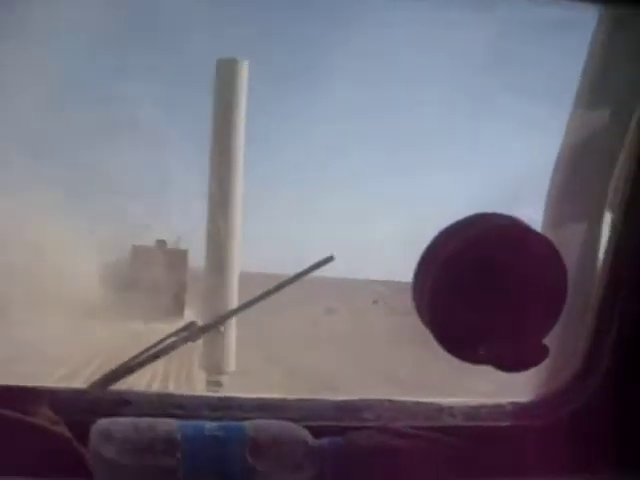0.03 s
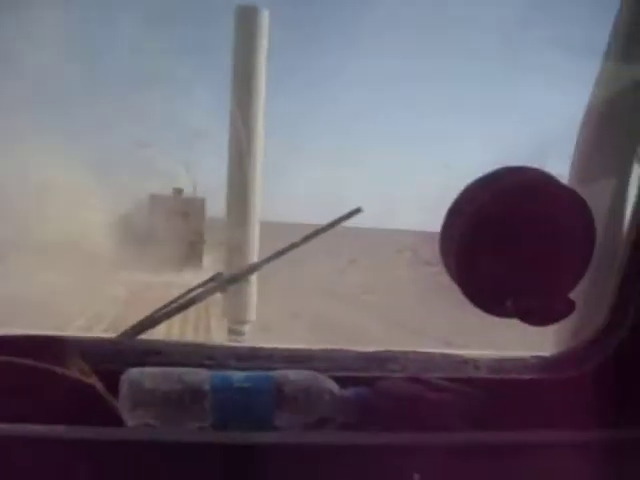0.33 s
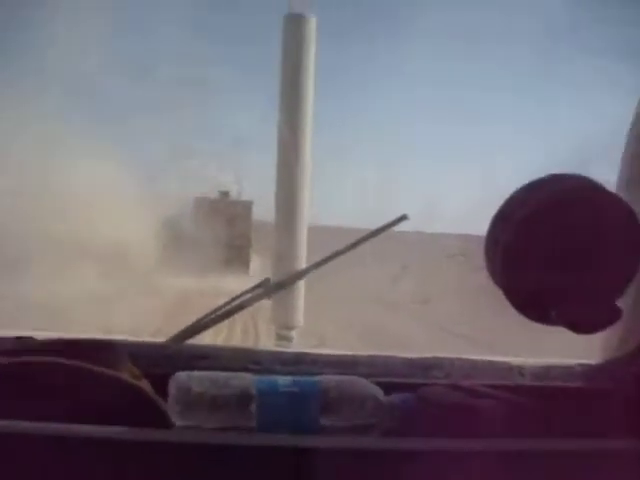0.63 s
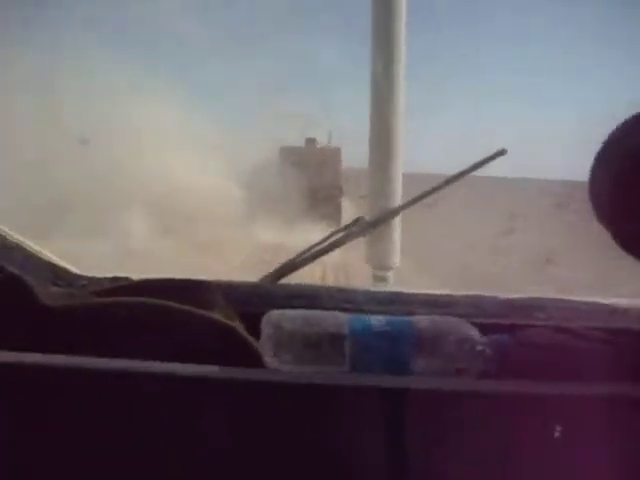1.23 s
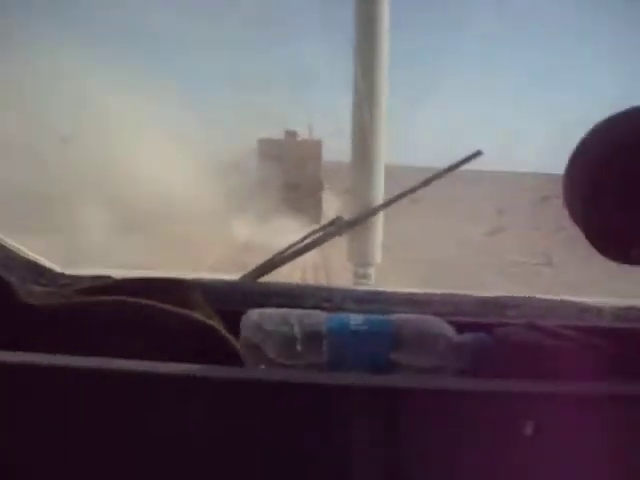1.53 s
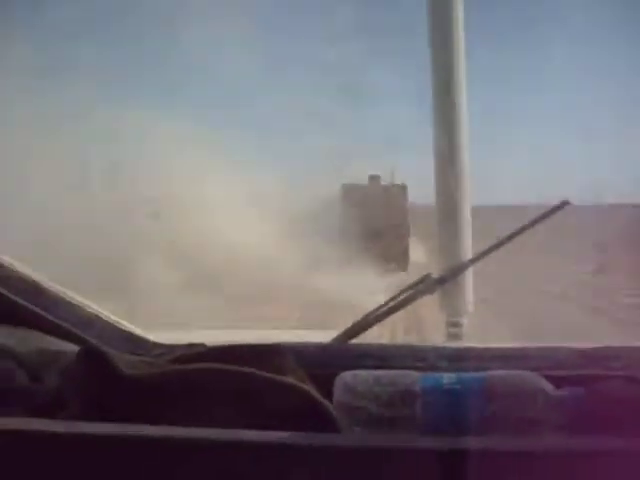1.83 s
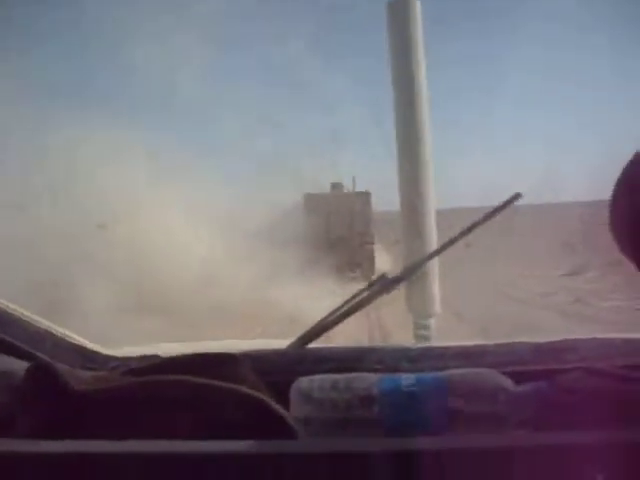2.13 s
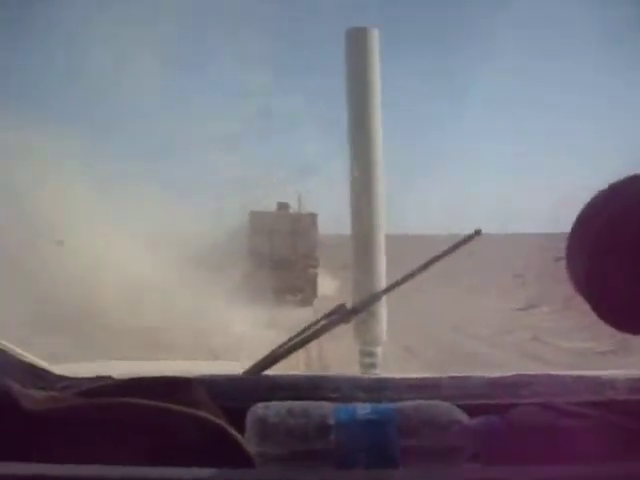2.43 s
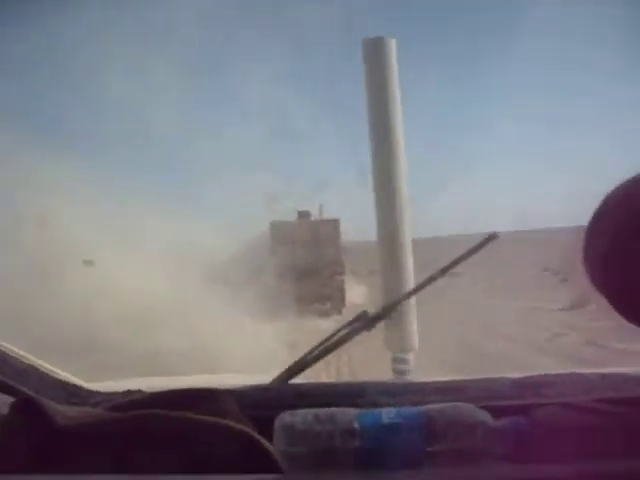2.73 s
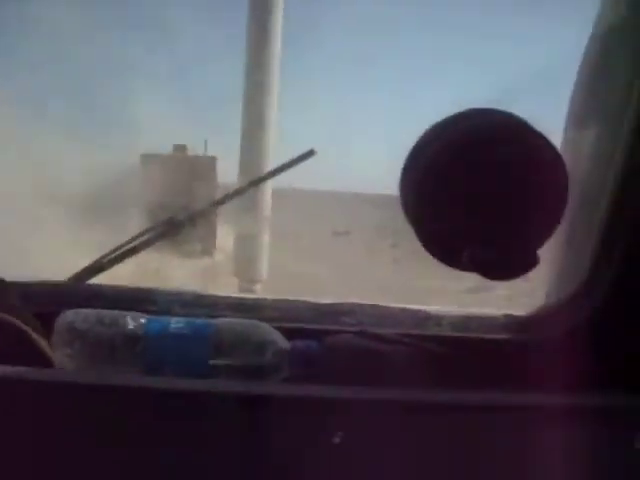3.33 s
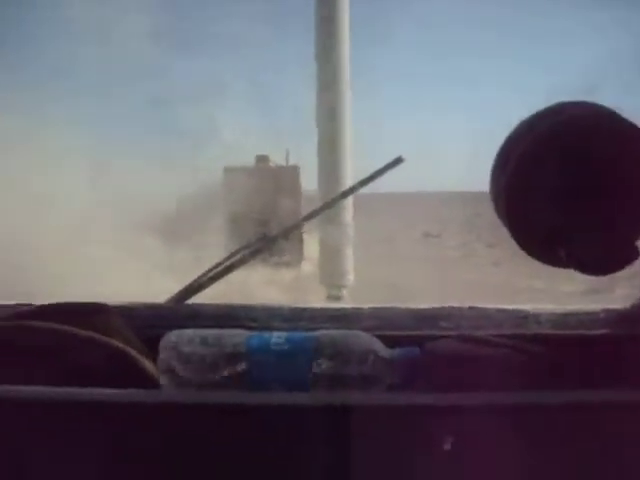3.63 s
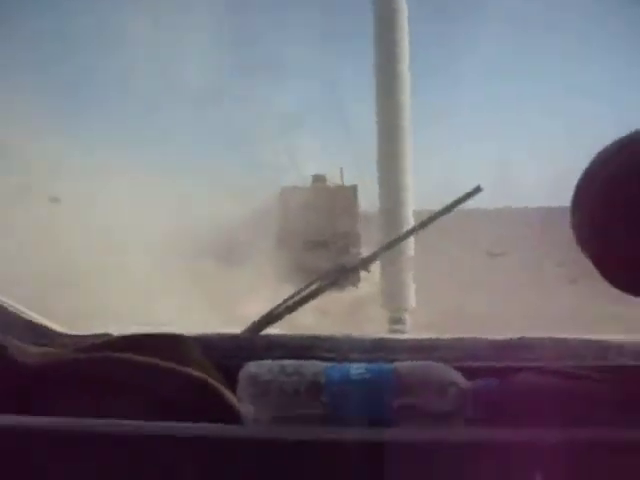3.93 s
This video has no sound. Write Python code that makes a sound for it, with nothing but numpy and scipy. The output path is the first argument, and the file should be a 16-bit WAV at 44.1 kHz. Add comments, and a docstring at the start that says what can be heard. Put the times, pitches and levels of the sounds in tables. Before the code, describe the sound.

Engine and tyre rumble inside a truck cab, with bumps setting off rattles and knocks.

```python
"""Inside the cab of a heavy truck driving along a rough desert track.
At once a hard bump shakes loose metal into rattles and knocks, overloading a narrow-band recorder.
The cab sways and booms over the roar of engine and tyres; a gear whines and the turbo winds down.
More bumps come just after one second, then the ride calms and the engine slows a little.
From about three seconds on, sharp rattles and knocks return."""
import sys
import numpy as np
from scipy import signal
from scipy.fft import rfft, irfft
from scipy.io import wavfile
from scipy.ndimage import uniform_filter1d

SR = 44100
rng = np.random.default_rng(int(sys.argv[2]) if len(sys.argv) > 2 else 0)


def master(y):
    """Save y as 16-bit WAV."""
    cut = np.clip(np.atleast_2d(y).T, -1, 1)
    pcm = np.round(cut * 32767)  # scale
    wavfile.write(sys.argv[1], SR, pcm.astype(np.int16))


N = 176400
T, HZ = np.arange(N) / SR, np.fft.rfftfreq(N, 1 / SR)


def rumble():
    """The track shakes the cab on its mounts and sets the air inside booming."""
    # how strong the shaking and the boom are (time [s], level [dB])
    sway_levels = [(0, -17), (.08, -10), (.16, -13), (.28, -21.5), (.4, -16.5), (.5, -19), (.85, -21),
                   (1.1, -17), (1.28, -22.5), (1.55, -16), (1.8, -23), (2.17, -18.5), (2.28, -22.5),
                   (2.9, -28), (3.06, -19.5), (3.25, -22.5), (3.5, -28), (3.6, -23), (4, -23)]
    boom_levels = [(0.0, -22.5), (0.31, -20), (0.34, -29.5), (1.1, -29.5), (1.16, -21), (1.2, -26.5),
                   (1.44, -23), (1.55, -37), (1.59, -25.5), (2.26, -23), (2.31, -33), (2.68, -31),
                   (2.72, -20), (2.78, -34.5), (3.32, -20.5), (3.5, -37.5), (3.62, -23.5), (4.0, -35.5)]
    # their tone colours (frequency [Hz], level [dB])
    sway_shape = [(5, -35.5), (12, -11.5), (18, 3), (26, 2), (34, -2.5), (48, -17), (75, -48.5)]
    boom_shape = [(40, -31), (55, -12), (68, -4), (82, 0.5), (97, -11.5), (122, -10.5), (150, -24),
                  (240, -38)]
    sway = steadied(colour(rng.standard_normal(N), sway_shape), amount=0.63)
    boom = steadied(colour(rng.standard_normal(N), boom_shape), amount=0.27)
    return sway * amp(curves(sway_levels)[0]) + boom * amp(curves(boom_levels)[0])


def engine():
    """Faint engine tones in a roar of engine and tyres that throbs each time a cylinder fires."""
    # engine speed (time [s], firing rate [Hz])
    firing = [(0, 79.5), (.8, 78), (1.4, 76.5), (1.9, 71.5), (2.6, 69), (3.3, 70.5), (3.7, 70.5), (4, 70)]
    # engine tones (multiple of the firing rate, level [dB])
    overtones = [(1, -37.5), (4, -43), (6, -44.5), (7, -43.5), (12, -38.5)]
    # strength of the roar (time [s], relative level [dB])
    roar_levels = [(0, -20), (.06, -15.5), (.15, -20), (.2, -18.5), (.25, -20), (.6, -21.5), (1.05, -21.5),
                   (1.11, -17.5), (1.3, -19), (1.38, -20), (1.58, -22), (2.5, -23), (3.3, -21.5),
                   (3.52, -24), (3.68, -24.5), (4, -21.5)]
    # its tone colour (frequency [Hz], level [dB])
    roar_shape = [(60, -14), (160, -7.5), (230, -3), (290, -1.5), (370, -3), (480, 0), (590, -5.5),
                  (680, -2), (760, .5), (840, 1.5), (930, 0.5), (1000, -4), (1150, -4.5), (1400, -11),
                  (1800, -14), (2600, -18.5), (3600, -19), (4400, -34.5)]
    turn = phase(curves(firing)[0] * (1 + 0.00601 * drift(rate_hz=12.2)))
    tones = np.zeros(N)
    for multiple, db in overtones:
        gain = amp(db + 1.97 * drift(rate_hz=3.2)) * np.sqrt(2)
        tones += gain * np.sin(multiple * turn + 2 * np.pi * rng.random())
    throb = 1 + 0.13 * np.cos(turn)
    roar = colour(rng.standard_normal(N) * throb, roar_shape)
    return tones + roar * amp(curves(roar_levels)[0] - 0.92 + .7 * drift(rate_hz=37))


def rattle(rise, fall, db, centre_hz, taps_per_s=1400, spread_db=6.5, size=8192):
    """Loose metal fittings ring under a flurry of taps that swells and dies away."""
    # notes the fittings ring with (pitch [Hz], width [Hz], level [dB])
    fittings = [(640, 36, -15.5), (1140, 95, -1.5), (1727, 99, 0.5), (1850, 90, 2.5), (2260, 210, -2.5),
                (2370, 77, 1), (2465, 44, 2.5), (2741, 90, -2), (3110, 170, -4), (3710, 200, -3.5)]
    t = np.arange(size) / SR - 2 * rise  # zero at the peak
    swell = np.exp(-(np.minimum(t, 0) / rise) ** 2 - np.maximum(t, 0) / fall)
    taps = clicks(taps_per_s, size) * amp(spread_db * (2 * rng.random(size) - 1))
    ringing = ring(taps * swell, fittings)
    octaves_away = np.log2((np.fft.rfftfreq(size, 1 / SR) + 1) / centre_hz)
    focus = amp(-6) + np.exp(-.5 * (octaves_away / 0.16) ** 2)  # favours notes near the centre
    return amp(db) * peaked(irfft(rfft(ringing) * focus))


def knock(db, pitch, decay_s=0.0057, size=4096):
    """A short, rough blow on a panel; the pitch depends on where it lands."""
    # notes the panel rings with (base pitch [Hz], width [Hz], level [dB])
    panel = [(300, 120, -7), (449, 60, 1), (565, 120, -2.5), (730, 42, -2.5), (926, 100, -4.5),
             (1158, 100, -0.5), (1450, 100, -2.5), (1565, 60, -6), (1750, 46, -6), (2997, 230, -9.5)]
    blow = rng.standard_normal(size) * np.exp(-np.arange(size) / SR / decay_s)
    return amp(db) * peaked(ring(blow, [(hz * pitch, width, level) for hz, width, level in panel]))


def thud(db, rise_s=0.02, size=8192):
    """The suspension hits its limit and the floor gives a soft, low thump."""
    # notes the floor rings with (pitch [Hz], width [Hz], level [dB])
    floor = [(245, 50, -2), (308, 45, 0.5), (347, 36, -4.5), (617, 21, 0)]
    age = np.arange(size) / SR / rise_s
    push = rng.standard_normal(size) * age * np.exp(-age)
    return amp(db) * peaked(ring(push, floor))


def gears(wobble=0.00542, flutter_db=2.5, octave_db=-38):
    """The gearbox gives a wavering whine and a second tone an octave higher."""
    # gear whine (time [s], pitch [Hz], level [dB])
    whine = [(0, 478, -34), (.3, 465.3, -32.5), (.52, 458.2, -32.5), (.7, 469, -32), (1.0, 459.4, -30.5),
             (1.27, 457.6, -31.5), (1.42, 477.5, -35), (1.8, 464, -39), (2.15, 468.2, -43),
             (2.5, 452.3, -43), (2.95, 470.7, -40.5), (3.4, 469.4, -36), (3.7, 456, -49), (4, 458.3, -42)]
    hz, db = curves(whine)
    turn = phase(hz * (1 + wobble * drift(rate_hz=12.1)))
    low = amp(db + flutter_db * drift(rate_hz=4)) * np.sin(turn)
    high = amp(octave_db + flutter_db * drift(rate_hz=36)) * np.sin(2 * turn)
    return np.sqrt(2) * (low + high)


def turbo(width_hz=37):
    """The turbo's fuzzy whistle sinks in pitch as it winds down."""
    # turbo whistle (time [s], pitch [Hz], level [dB])
    whistle = [(0, 2231, -28), (.35, 2145, -34.5), (.8, 2130, -37), (1.25, 1998, -30.5), (1.6, 1950, -40.5),
               (2.1, 1868, -40.5), (2.8, 1727, -47), (4, 1663, -38.5)]
    hz, db = curves(whistle)
    turn = phase(hz)
    return amp(db) * (drift(width_hz) * np.cos(turn) + drift(width_hz) * np.sin(turn))


def chatter(ticks_per_s=3500, spread_db=3):
    """Grit and the cab's trim make countless tiny ticks."""
    # strength of the ticking (time [s], level [dB])
    levels = [(0, -18), (.1, -24.5), (.33, -25), (.45, -31), (1.03, -30.5), (1.17, -23), (1.3, -27.5),
              (1.45, -25), (1.6, -29.5), (1.85, -33.5), (2.2, -31.5), (2.5, -34.5), (2.68, -31.5),
              (2.85, -36), (3.3, -29), (3.5, -38), (3.85, -30), (4, -29)]
    # its tone colour (frequency [Hz], level [dB])
    shape = [(300, -13.5), (1000, -10.5), (1400, -10.5), (1800, -2.5), (2200, 0.5), (2700, -6), (3100, -5),
             (3600, -7.5), (4400, -9.5)]
    ticks = clicks(ticks_per_s, N) * amp(spread_db * np.minimum(rng.exponential(1, N), 4))
    return colour(ticks, shape) * amp(curves(levels)[0] + .8 * drift(rate_hz=35))


def cab(x, echoes_per_s=2000, fade_s=0.11, echo_db=-16, size=8192):
    """The close walls of the cab add dense echoes that die quickly."""
    t = np.arange(size) / SR
    echoes = rng.standard_normal(size) * (rng.random(size) < echoes_per_s / SR)
    echoes *= (t > .002) * amp(-60 * t / fade_s)
    return x + amp(echo_db) * signal.fftconvolve(x, echoes / np.linalg.norm(echoes))[:N]


def amp(db):
    """Turns decibels into a gain."""
    return 10 ** (np.asarray(db) / 20)


def unit(x):
    """Scales x to an average strength (rms) of 1."""
    return x / np.sqrt(np.mean(abs(x) ** 2) + 1e-20)


def peaked(x, size=441):
    """Scales the loudest hundredth of a second to a strength of 1."""
    return x / np.sqrt(uniform_filter1d(x ** 2, size).max() + 1e-20)


def curves(table):
    """Joins the points of a time table into one curve per column."""
    times, *columns = np.transpose(table)
    return [np.interp(T, times, column) for column in columns]


def colour(x, shape):
    """Gives x a tone colour, at a strength of 1."""
    hz, db = np.transpose(shape)
    gain = amp(np.interp(np.log(HZ + 1), np.log(hz), db)) * (HZ < 2 * hz[-1])
    return unit(irfft(rfft(x) * gain, N))


def drift(rate_hz):
    """A smooth random wobble, up to about the given rate."""
    return unit(irfft(rfft(rng.standard_normal(N)) * np.exp(-(HZ / rate_hz) ** 2), N))


def clicks(per_s, size):
    """Clicks at random moments."""
    return (rng.random(size) < per_s / SR) * rng.choice([-1, 1], size)


def steadied(x, amount):
    """Evens out the random swells of a rumble."""
    envelope = abs(signal.hilbert(x))
    return unit(x / (envelope + .2) ** amount)


def phase(hz):
    """The growing angle of a wave that follows a pitch curve."""
    return 2 * np.pi * np.cumsum(hz) / SR


def ring(x, notes):
    """Lets x set an object ringing at its own notes."""
    f = np.fft.rfftfreq(len(x), 1 / SR)
    body = sum((-1) ** k * amp(db) * 1j * f * width / (hz ** 2 - f ** 2 + 1j * f * width)
               for k, (hz, width, db) in enumerate(notes))
    return irfft(rfft(x) * body, len(x))


def add(mix, start_s, sound):
    """Mixes a sound in at the given time."""
    at = round(start_s * SR)
    sound = sound[max(-at, 0):]
    part = mix[max(at, 0):][:len(sound)]
    part += sound[:len(part)]


def scene():
    """The steady drive with knocks, rattles and thuds on top."""
    # blows on a panel (time [s], level [dB], pitch [ratio])
    knocks = [(.010, -14.5, 1.37), (0.021, -14, 0.93), (.057, -11, 1.04), (.064, -14, 1.25),
              (0.196, -24, 1.1), (.448, -24.5, 1.13), (1.111, -22, 1.1), (1.135, -22, 1.05),
              (1.372, -19, 1.11), (1.394, -21, 0.77), (3.610, -13.5, 1.08), (3.622, -12.5, 1.024),
              (3.971, -19.5, 1.21)]
    # shaken fittings (peak time [s], rise [s], fall [s], level [dB], centre pitch [Hz])
    rattles = [(.008, 0.0068, 0.035, -11, 3130), (.059, 0.0038, .009, -14, 2830),
               (.122, 0.0079, 0.0086, -20.5, 2260), (0.188, .008, .012, -25, 3250),
               (.224, .005, 0.014, -17, 2730), (.322, 0.015, 0.019, -24, 2480),
               (1.088, .012, 0.024, -19, 3100), (1.112, 0.0063, 0.015, -14.5, 2400),
               (1.19, .012, 0.014, -21.5, 2200), (1.335, .006, .015, -24.5, 3500),
               (1.355, .006, 0.015, -13.5, 2500), (1.377, .007, 0.014, -14.5, 2300),
               (1.654, .007, 0.01, -16.5, 2200), (1.945, 0.0088, .015, -26.5, 2200),
               (1.995, 0.0096, .012, -26.5, 2220), (2.029, 0.0086, .012, -27.5, 2240),
               (2.174, .012, 0.018, -24, 2275), (2.36, .015, 0.019, -30.5, 3350),
               (2.675, 0.019, 0.0097, -30, 2390), (2.938, 0.011, 0.014, -18, 2900),
               (3.210, 0.0037, .02, -14.5, 2800), (3.289, .012, 0.018, -26.5, 3220),
               (3.37, .006, 0.0091, -31, 2600), (3.970, 0.0029, .014, -13, 2900)]
    # suspension thuds (time [s], level [dB])
    thuds = [(.02, -22.5), (.185, -19.5), (1.1, -20.5), (1.365, -18), (3.215, -25)]
    drive = rumble() + engine() + gears() + turbo() + chatter()
    bumps = np.zeros(N)
    for time, db, pitch in knocks:
        add(bumps, time, knock(db, pitch))
    for time, rise, fall, db, centre_hz in rattles:
        add(bumps, time - 2 * rise, rattle(rise, fall, db, centre_hz))
    for time, db in thuds:
        add(bumps, time, thud(db))
    return (drive + cab(bumps))[None]


def record(dry, band_hz=4130, clip_level=.72, edge_hz=15850):
    """The recorder cuts the treble, flattens the loudest peaks, then trims the very highest sounds."""
    band_filter = signal.firwin(201, band_hz, window=("kaiser", 9), fs=SR)
    edge_filter = signal.firwin(511, edge_hz, window=("kaiser", 9), fs=SR)
    narrow = signal.oaconvolve(dry, band_filter[None], "same")
    clipped = np.clip(narrow, -clip_level, clip_level)
    return signal.oaconvolve(clipped, edge_filter[None], "same")


dry = scene()
out = record(dry)
master(out)
```